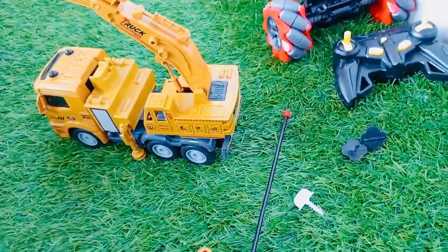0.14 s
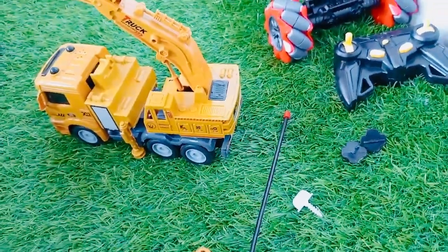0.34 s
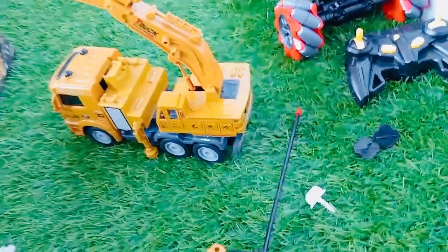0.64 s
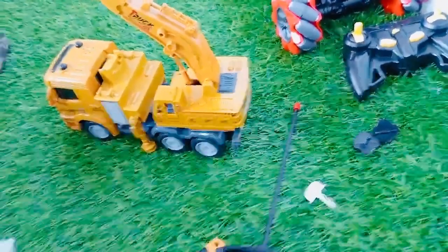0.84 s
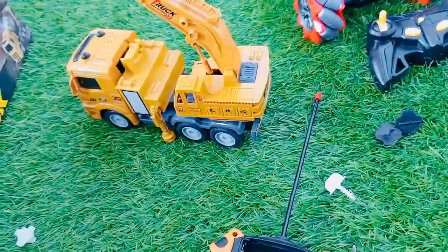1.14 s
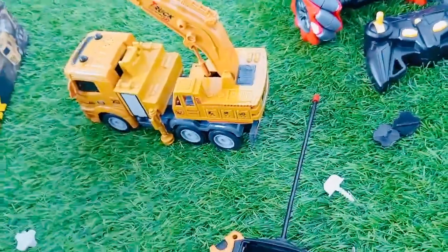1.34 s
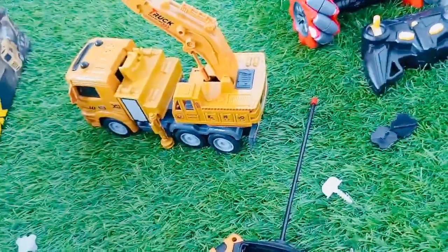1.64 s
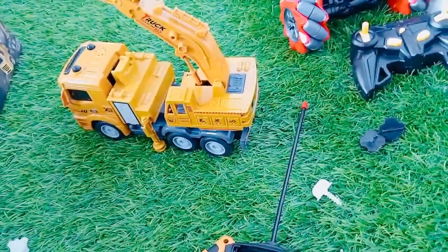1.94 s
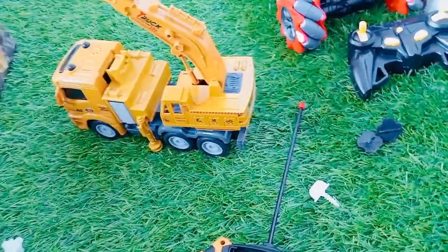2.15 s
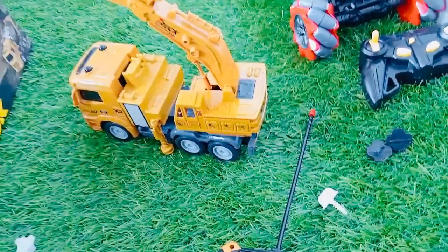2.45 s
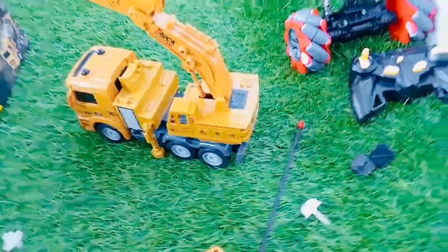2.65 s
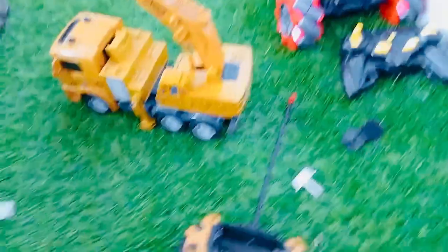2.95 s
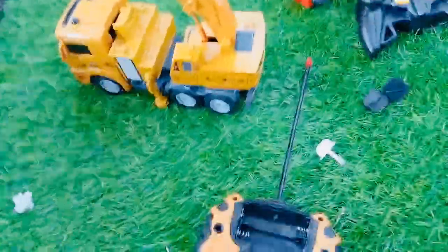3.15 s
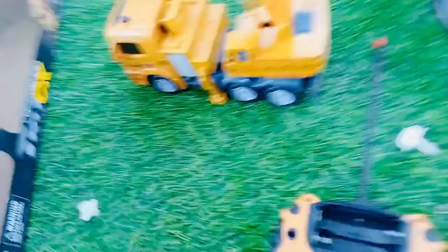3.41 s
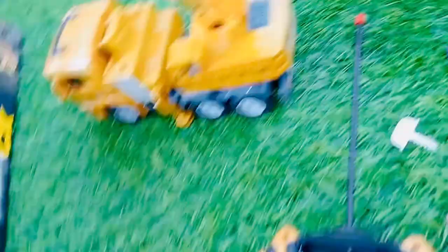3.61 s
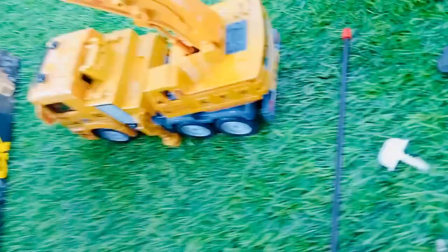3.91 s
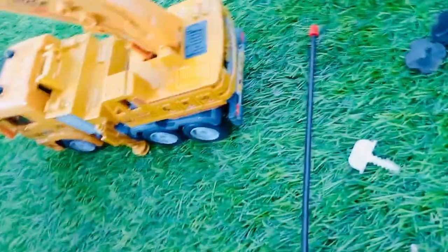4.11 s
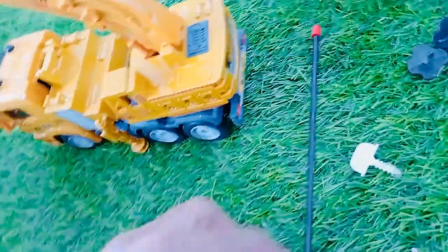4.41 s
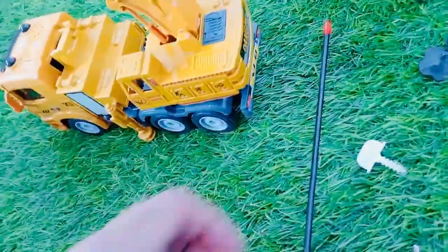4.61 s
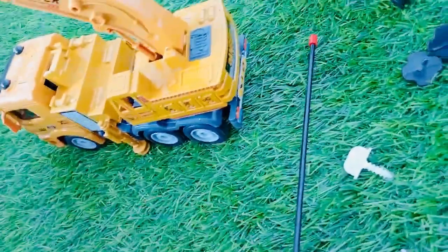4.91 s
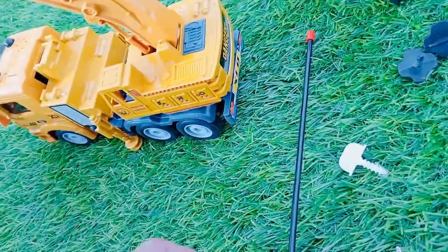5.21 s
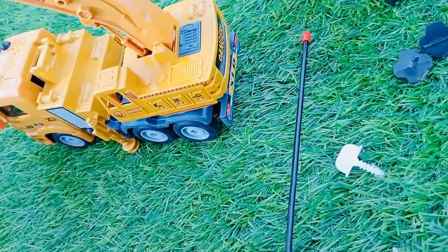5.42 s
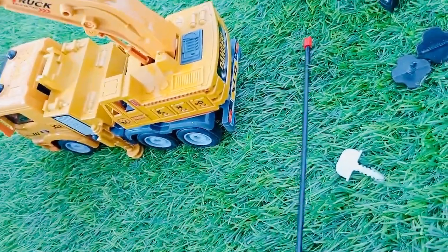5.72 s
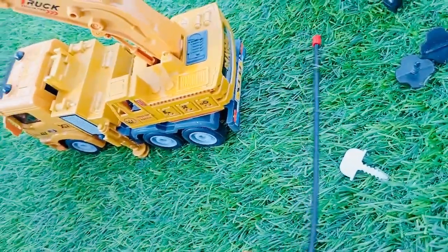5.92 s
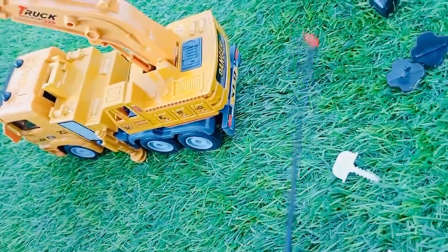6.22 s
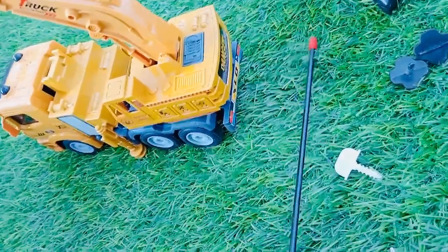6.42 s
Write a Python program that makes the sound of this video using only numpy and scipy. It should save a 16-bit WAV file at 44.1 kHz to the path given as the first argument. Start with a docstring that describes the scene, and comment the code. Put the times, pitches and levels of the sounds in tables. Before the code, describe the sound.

Fingers busily work a small hollow plastic case, clicking and crackling, then easing into rubs and a few sharp knocks above soft rumble and hiss.

```python
"""Clicks, rattles and fine crinkle of a small plastic remote control handled and opened close by;
later a few single knocks and a faint thin whine, over a low hum, rumble and hiss.
Contacts are gritty noise bursts with spectra of the struck parts; crinkle is chance slips ringing
small modes; rubs are shaped noise, the whine three partials. The shell's modes, echoes and a
diffuse tail follow the clicks, knocks and crinkle."""
import sys
import numpy as np
from scipy import signal
from scipy.fft import rfft, irfft, next_fast_len
from scipy.io import wavfile
from scipy.ndimage import uniform_filter1d

SR = 44100
rng = np.random.default_rng(int(sys.argv[2]) if len(sys.argv) > 2 else 0)


def int16_out(signal):
    """Quantize to a 16-bit WAV file."""
    q = np.round(np.clip(np.atleast_2d(signal).T, -1, 1) * 32767)
    wavfile.write(sys.argv[1], SR, q.astype(np.int16))


N = 289296
TIME = np.arange(N) / SR
CONTACT_SAMPLES = 4096
CONTACT_HZ = np.fft.rfftfreq(CONTACT_SAMPLES, 1 / SR)

# fingers working the plastic: (time [s], relative level [dB])
HANDLING = [(0.0, -31), (0.33, -36), (0.42, -58), (0.72, -59.5), (0.8, -38), (1.1, -30), (1.31, -41),
            (1.51, -55.5), (1.91, -32.5), (2.47, -47.5), (2.54, -32), (2.71, -30), (2.79, -56),
            (2.93, -35.5), (3.3, -52.5), (3.61, -60), (3.81, -47.5), (4.3, -72)]
# small parts of the case that ring along with any click: frequency [Hz]
PARTS_HZ = [431, 597, 1020, 1868, 2295, 2520, 2900, 3245, 3630, 4100]


def from_db(db):
    """Decibels to amplitude gain."""
    return 10 ** (np.asarray(db) / 20)


def rms_one(x):
    """Scale to unit rms."""
    return x / np.sqrt(np.mean(x ** 2) + 1e-20)


def in_time(rows):
    """Interpolate a (time, value) curve at every sample."""
    return np.interp(TIME, *np.transpose(rows))


def at_hz(points, hz):
    """Interpolate a spectrum on a log-frequency axis."""
    f, value = np.transpose(points)
    return np.interp(np.log(np.maximum(hz, 1)), np.log(f), value)


def drift(knots_per_s):
    """Random curve of unit rms, straight between its knots."""
    knots = rng.standard_normal(int(N / SR * knots_per_s) + 2)
    return rms_one(np.interp(TIME * knots_per_s, np.arange(len(knots)), knots))


def coloured(x, spectrum):
    """Shape a sound with a fixed spectrum; unit rms."""
    size = next_fast_len(N)
    gain = from_db(at_hz(spectrum, np.fft.rfftfreq(size, 1 / SR)))
    return rms_one(irfft(rfft(x, size) * gain, size)[:N])


def band(x, low_hz, high_hz, order=2):
    """Causal band-pass."""
    return signal.sosfilt(signal.butter(order, [low_hz, high_hz], "band", fs=SR, output="sos"), x)


def resonance(x, hz, width_hz):
    """One two-pole mode, gain 1 at its top."""
    r = np.exp(-np.pi * width_hz / SR)
    zeros = np.array([1, 0, -1]) * (1 - r * r) / 2
    poles = [1, -2 * r * np.cos(2 * np.pi * hz / SR), r * r]
    return signal.lfilter(zeros, poles, x + 1e-18)


def peak(hz, centre_hz, half_width_hz):
    """The shape of one resonance, 1 at its top."""
    return 1 / (1 + ((hz - centre_hz) / half_width_hz) ** 2)


def causal(gain):
    """Minimum-phase response with these gains: nothing sounds before the blow."""
    cepstrum = irfft(np.log(gain))
    half = cepstrum.shape[-1] // 2
    fold = np.r_[1, np.full(half - 1, 2), 1, np.zeros(half - 1)]
    return np.exp(rfft(cepstrum * fold))


def lifted(colour, hz, body_db, edge_db):
    """A contact's spectrum in dB: a heavier blow lifts the bass, a harder edge the treble."""
    body = at_hz([(974, 1), (2160, 0)], hz)
    edge = at_hz([(5300, 0), (9760, 1)], hz)
    return at_hz(colour, hz) + body_db * body + edge_db * edge


def contacts(times, colours_db, chatter_t60, snap, snap_t60, even_hz=1000, gritty_db=3.5, grit_per_s=1500):
    """Each contact is a hard snap and brief chatter of two edges, rung through the struck part."""
    size = CONTACT_SAMPLES
    t = np.arange(size) / SR
    force = from_db(-60 * t / chatter_t60) + snap * from_db(-60 * t / snap_t60)
    noise, grit = rng.standard_normal((len(times), 2, size)).transpose(1, 0, 2)
    held_grit = grit[:, (t * grit_per_s).astype(int) % size]
    chatter = rfft(noise * force * from_db(gritty_db * held_grit))
    # the chatter sets only the fine grain; the broad colour belongs to the part
    broad = np.sqrt(uniform_filter1d(np.abs(chatter) ** 2, max(int(even_hz * size / SR), 1)))
    scale = SR * np.sqrt(.005 / 2)  # refers spectra to rms over 5 ms
    out = np.zeros(N + size)
    for s, colour_db, grain, smooth in zip(times, colours_db, chatter, broad):
        start = max(int(s * SR), 0)
        out[start:start + size] += scale * irfft(grain * causal(from_db(colour_db) / smooth))
    return out[:N]


def background(wander_rad=0.61, flutter_db=1.7, flutter_per_s=16, hiss_db=-56.5):
    """Quickly and slightly fluctuating low noise, steady soft hiss, and hum lines of wavering phase."""
    # hum lines: (frequency [Hz], level [dB rms])
    hum_lines = [(86, -56), (203, -58), (301, -66)]
    # room rumble: (time [s], level [dB])
    rumble_level = [(0.0, -45.5), (2.2, -47.5), (3.8, -43), (6.56, -45)]
    # rumble spectrum: (frequency [Hz], relative density [dB per Hz])
    rumble_colour = [(25, -28), (45, -15.5), (62, -3.5), (88, -1), (125, -4), (150, 1), (210, 2),
                     (255, -10.5), (330, -15), (450, -24), (800, -34.5), (2000, -64.5)]
    # hiss spectrum: (frequency [Hz], relative density [dB per Hz])
    hiss_colour = [(100, -5), (400, 0.5), (1300, -1), (3500, -7.5), (6000, -19.5), (9000, -36.5),
                   (16000, -50)]
    hum = 0
    for hz, db in hum_lines:
        phase = 2 * np.pi * hz * TIME + wander_rad * drift(8)
        hum = hum + from_db(db) * np.sqrt(2) * np.sin(phase)
    level = from_db(in_time(rumble_level) + flutter_db * drift(flutter_per_s))
    rumble = level * coloured(rng.standard_normal(N), rumble_colour)
    hiss = from_db(hiss_db) * coloured(rng.standard_normal(N), hiss_colour)
    return hum + rumble + hiss


def room_tail(first_s=0.0089, build_s=0.00073, size=22000):
    """A diffuse tail of noise bands, each with its own decay time."""
    # room decay: (frequency [Hz], t60 [s])
    decay_t60 = [(300, 0.54), (800, 0.42), (2100, 0.25), (5500, 0.26), (14000, 0.099)]
    # tail colour: (frequency [Hz], level [dB])
    tail_colour = [(200, -3.5), (600, -6), (1300, -6), (2900, -2.5), (6000, -12.5), (14000, -5)]
    t = np.arange(size) / SR
    build = np.clip((t - first_s) / build_s, 0, 1)
    edges_hz = np.geomspace(150, 17000, 11)
    tail = 0
    for low, high in zip(edges_hz, edges_hz[1:]):
        hz = np.sqrt(low * high)
        decay = from_db(-60 * t / at_hz(decay_t60, hz)) * build
        gain = np.sqrt(2 * (high - low) / SR / size) * from_db(at_hz(tail_colour, hz))
        tail = tail + gain * rms_one(band(rng.standard_normal(size), low, high) * decay)
    return tail


def room(x, wall_hz=8000, move_s=.12, count=5):
    """Dulled echoes off nearby surfaces, and a tail whose fine pattern changes as the hands move."""
    # nearby surfaces: (delay [s], level [dB])
    echoes = [(0.0128, -10.5), (.0145, -13), (.0185, -31.5), (0.0263, -14.5), (0.0333, -21), (0.044, -19),
              (0.07, -24.5)]
    dull = signal.lfilter(*signal.butter(1, wall_hz, fs=SR), x)
    out = sum(from_db(db) * np.pad(dull, (int(delay * SR), 0))[:N] for delay, db in echoes)
    for place in range(count):  # crossfade in turn between tails
        share = np.clip(1 - np.abs((TIME / move_s - place) % count - 1), 0, 1)
        out = out + signal.oaconvolve(x * np.sin(np.pi / 2 * share), room_tail())[:N]
    return out


def whine(base_hz=432.5, waver=0.002):
    """Three high partials of one slightly unsteady tone."""
    # thin whine: (time [s], level [dB])
    whine_level = [(5.28, -80), (5.35, -69), (5.5, -65), (5.555, -52), (5.59, -53.5), (5.617, -65),
                   (5.645, -51), (5.69, -66), (5.76, -81)]
    # partials: (multiple of base_hz, relative level [dB])
    partials = [(7, -4.5), (8, 2.5), (9, -9)]
    phase = 2 * np.pi * np.cumsum(base_hz * (1 + waver * drift(32))) / SR
    tone = sum(from_db(db + 2 * drift(35)) * np.sin(round(k) * phase) for k, db in partials)
    sounding = (TIME > whine_level[0][0]) * (TIME < whine_level[-1][0])
    return rms_one(tone) * from_db(in_time(whine_level)) * sounding


def rubs(rub_hz=(950, 1550), rustle_hz=(3800, 6000), uneven_db=3.5, level_db=-7.5):
    """Skin drags unevenly over the case: a dull rub with a light rustle above it."""
    # strokes: (centre time [s], half-length [s], relative rub level [dB], relative rustle level [dB])
    strokes = [(0.415, 0.045, -45, -50), (3.417, 0.26, -51.5, -81), (3.657, 0.062, -41.5, -62),
               (3.74, 0.12, -62, -70), (4.939, .05, -51.5, -66), (5.02, 0.08, -49, -58.5),
               (5.709, 0.076, -53.5, -76.5), (6.222, 0.1, -53.5, -56.5), (6.305, 0.084, -47, -55),
               (6.52, 0.25, -53, -78)]
    rub = rms_one(band(rng.standard_normal(N), *rub_hz))
    rustle = rms_one(band(rng.standard_normal(N), *rustle_hz))
    out = 0
    for s, half_length_s, rub_db, rustle_db in strokes:
        stroke = np.cos(np.pi / 2 * np.clip((TIME - s) / half_length_s, -1, 1)) ** 2
        out = out + stroke * (from_db(rub_db) * rub + from_db(rustle_db) * rustle)
    return out * from_db(uneven_db * drift(70) + level_db)


def low_bodies():
    """Low, hollow body of some clicks, around 300 to 600 Hz."""
    # low bodies: (time [s], relative level [dB])
    bodies = [(0.794, -35.5), (1.531, -38.5), (1.879, -33), (1.908, -36), (2.002, -39), (2.072, -31.5),
              (2.15, -40), (2.854, -28), (2.894, -29), (2.928, -26), (3.04, -39), (3.146, -40),
              (3.254, -41), (3.628, -42)]
    # their spectrum: (frequency [Hz], density [dB per Hz])
    body_colour = [(100, -52), (300, -33.5), (420, -25.5), (520, -32.5), (600, -28), (900, -42.5),
                   (3000, -70), (16000, -94.5)]
    colours = [db + at_hz(body_colour, CONTACT_HZ) for s, db in bodies]
    times = [row[0] for row in bodies]
    return contacts(times, colours, chatter_t60=0.027, snap=0.9, snap_t60=0.006, gritty_db=2.0)


def flicks():
    """A springy catch flicks free, ringing briefly around one high pitch."""
    # releases: (time [s], relative level [dB], ring [Hz])
    releases = [(0.302, -18.5, 4340), (5.906, -18.5, 5300), (6.478, -48.5, 8400)]
    # flick spectrum: (multiple of its ring, density [dB per Hz])
    flick_colour = [(.05, -74), (.42, -56), (.54, -42.5), (.64, -51), (.86, -41), (1, -30), (1.22, -43),
                    (1.5, -55.5), (2.8, -63)]
    colours = []
    for s, db, hz in releases:
        colours.append(db + at_hz([(k * hz, level) for k, level in flick_colour], CONTACT_HZ))
    times = [row[0] for row in releases]
    return contacts(times, colours, chatter_t60=0.024, snap=0.9, snap_t60=0.006, gritty_db=3.0)


def crinkle(per_s=550, spread_db=5.0, clump_db=0.5, slip_t60=0.017, ring_db=11.5, ring_width_hz=260,
            level_db=-3.5, count=20):
    """Clumped gritty slips of plastic on plastic; each rings one small part of the case."""
    # crinkle spectrum: (frequency [Hz], relative density [dB per Hz])
    crinkle_colour = [(150, -51), (250, -22.5), (436, -5.5), (802, -6), (890, 5), (1380, -4.5), (2130, -2),
                      (3980, -0.5), (7310, -8), (12100, -24), (13900, -17), (16000, -34)]
    sizes = from_db(spread_db * np.minimum(rng.exponential(1, N), 3.5))
    slips = sizes * (rng.random(N) < per_s / SR) * from_db(clump_db * drift(90))
    fade = from_db(-60 / (slip_t60 * SR)) ** 2  # power decay per sample
    power = signal.lfilter([1 - fade], [1, -fade], slips ** 2 + 1e-18)
    grit = np.sqrt(power) * rng.standard_normal(N)
    part = rng.integers(0, count, N)
    pitches_hz = np.linspace(900, 7500, count)
    rings = sum(resonance(slips * (part == k), hz, ring_width_hz) for k, hz in enumerate(pitches_hz))
    hands_on = np.clip((HANDLING[-1][0] - TIME) * 10, 0, 1)
    level = from_db(in_time(HANDLING) + level_db) * hands_on
    return coloured(grit + from_db(ring_db) * rings, crinkle_colour) * level


def soften(x, soft_hz=6000, full_db=-40, soft_range_db=16):
    """A light touch makes a duller crinkle: the treble fades as the fingers ease off."""
    dull = signal.sosfilt(signal.butter(2, soft_hz, fs=SR, output="sos"), x)
    firm = np.clip(1.5 + (in_time(HANDLING) - full_db) / soft_range_db, 0, 1)
    return firm * x + np.sqrt(1 - firm ** 2) * dull


def shell(x):
    """The hollow case colours a sound with its own resonances."""
    # shell modes: (frequency [Hz], width [Hz], lift [dB])
    shell_modes = [(686, 63, 2.5), (1020, 180, 0.5), (1340, 410, -2), (1490, 150, 1), (1870, 180, 3),
                   (2370, 82, -0.5), (2946, 39, 0.5), (4150, 470, -1), (5660, 200, 0)]
    return x + sum((from_db(lift_db) - 1) * resonance(x, hz, width) for hz, width, lift_db in shell_modes)


def knocks(ring_share=1, low_db=7.5, low_half_width_hz=190):
    """Each dull knock rings the whole case, with a lower ring that depends on where it lands."""
    # knocks: (time [s], relative level [dB], hollow body lift [dB], hard edge lift [dB],
    #          relative case ring [dB], low ring [Hz])
    blows = [(4.444, -52, 11, 2, 2, 1295), (4.502, -41, 9, -15, 20, 1210), (4.562, -25, 3.5, -7, 6.5, 1256),
             (4.577, -22.5, 0, -7, 10, 1636), (4.581, -27.5, -1.5, 4, 15, 1020),
             (5.172, -41.5, 0, 1, -1, 1800), (5.195, -36.5, 3, -5, 9, 860), (5.769, -28, 4, -1.5, 13, 1520),
             (6.012, -13.5, -3, -0.5, 10.5, 1350)]
    # knock spectrum: (frequency [Hz], density [dB per Hz])
    knock_colour = [(100, -62), (400, -48), (974, -36.5), (1450, -36), (1880, -43), (2300, -38),
                    (4533, -39), (9544, -64), (11000, -60), (16000, -74.5)]
    # modes of the whole case: (frequency [Hz], half-width [Hz], share of its ring)
    case_modes = [(2280, 130, 0.29), (2916, 184, 1.31), (3360, 63, 0.27), (4400, 120, 0.11),
                  (5240, 190, .3), (6180, 310, 0.65)]
    case = sum(share * peak(CONTACT_HZ, hz, width) for hz, width, share in case_modes)
    colours = []
    for s, db, body_db, edge_db, case_db, hz in blows:
        ring = case_db * case + low_db * peak(CONTACT_HZ, hz, low_half_width_hz)
        colours.append(lifted(knock_colour, CONTACT_HZ, body_db, edge_db) + db + ring_share * ring)
    times = [row[0] for row in blows]
    return contacts(times, colours, chatter_t60=0.025, snap=0.99, snap_t60=0.013, gritty_db=1.2)


def light_ticks(level_db=-4.0, spread_db=7.0, body_db=-6.0, edge_db=-8.5, count=40):
    """Rows for clicks(): loose parts tick at random times, as strongly as the fingers press."""
    when, strength, part = rng.random((count, 3)).T
    times = when * HANDLING[-1][0]
    levels = np.interp(times, *np.transpose(HANDLING)) + level_db + spread_db * (2 * strength - 1)
    rings_hz = [PARTS_HZ[int(k)] for k in part * len(PARTS_HZ)]
    return [(s, db, body_db, edge_db, hz) for s, db, hz in zip(times, levels, rings_hz)]


def clicks(rows, ring_share=1, main_db=10.0, ring_half_width_hz=170, shoulder_db=3.5, shoulder_width=.25,
           parts_db=3.0, parts_width=0.024, level_db=-1.0):
    """Each click rings the struck part on a broad shoulder, and other parts by chance amounts."""
    # click spectrum: (frequency [Hz], density [dB per Hz])
    click_colour = [(100, -68.5), (400, -45), (700, -38), (974, -32), (1400, -38), (2176, -38),
                    (4533, -36.5), (9544, -42), (11500, -49.5), (13500, -49), (16000, -55)]
    part_peaks = [peak(CONTACT_HZ, hz, parts_width * hz) for hz in PARTS_HZ]
    others = rng.exponential(1, (len(rows), len(PARTS_HZ))).clip(0, 2) @ part_peaks
    colours = []
    for (s, db, body_db, edge_db, hz), along in zip(rows, others):
        strike = lifted(click_colour, CONTACT_HZ, body_db, edge_db) + db + level_db
        shoulder = shoulder_db * peak(CONTACT_HZ, hz, shoulder_width * hz)
        ring = np.maximum(main_db * peak(CONTACT_HZ, hz, ring_half_width_hz), parts_db * along)
        colours.append(strike + shoulder + ring_share * ring)
    return contacts([row[0] for row in rows], colours, chatter_t60=0.025, snap=0.93, snap_t60=0.0063)


def scene(click_ring=0.55, knock_ring=0.69, click_room_db=1.5, knock_room_db=1.5):
    """The remote, its room, and the background."""
    # case clicks under the fingers: (time [s], relative level [dB], hollow body lift [dB],
    #                                 hard edge lift [dB], ring of the struck part [Hz])
    finger_clicks = [(0.017, -27, -29, -31, 2610), (0.065, -17.5, -1, -10, 6800),
                     (0.082, -31, -18, 5, 4600), (0.093, -23, -14, -11.5, 2600), (0.102, -23, -6, -4, 2460),
                     (0.14, -19, -9, -7.5, 6270), (0.207, -30.5, 2, -5, 1870), (0.2446, -18, -6, -10, 2536),
                     (0.251, -18, -7, -7, 2210), (0.279, -29, -2, -19, 2530), (0.288, -27, -2, 5.5, 3440),
                     (0.376, -40.5, -16, 7.5, 4620), (0.769, -34, 3.5, -1.5, 1870),
                     (0.786, -32, 1, -6, 4070), (0.791, -17, -8, -22, 1775), (0.794, -18, -16, -6.5, 1860),
                     (0.831, -25.5, -13, 3, 1790), (0.863, -31, -20, -1, 4900), (0.915, -24, -2, -8, 970),
                     (0.951, -44, -2, -12, 1790), (0.977, -25, -23, -8.5, 1846),
                     (1.02, -22.5, -9, -5, 2520), (1.026, -25, 1, -6, 2580), (1.037, -22, -3.5, -1.5, 2270),
                     (1.053, -23.5, -16, 0, 4860), (1.064, -30.5, -1, 10, 3660),
                     (1.09, -22.5, -19, -18, 2470), (1.102, -30, -18, -5, 4400),
                     (1.112, -22.5, -4, -6, 4800), (1.116, -15, -4.5, -5.5, 4040),
                     (1.143, -25.5, -13, 0, 4270), (1.159, -26.5, -2, -2, 4200),
                     (1.185, -27.5, -11, -16, 4860), (1.2, -26, 0, -13, 3700),
                     (1.226, -29.5, -3, -27, 2590), (1.303, -34.5, 6, -6, 3270),
                     (1.322, -32.5, -1, -4.5, 3490), (1.384, -25, -3.5, -7.5, 910),
                     (1.423, -34, 4, -12, 3980), (1.43, -28, -5, -4, 3950), (1.453, -32.5, 4, -8, 2560),
                     (1.531, -24, 0, -20.5, 2530), (1.625, -39, -16, -23, 3270),
                     (1.684, -29, -2.5, -22, 2470), (1.701, -35.5, 1, -30, 2280),
                     (1.735, -35, -2, -10, 4470), (1.76, -27, -6, -8, 2540), (1.799, -27.5, -17, -1, 2600),
                     (1.811, -27.5, -14, -4, 3960), (1.816, -28, -12, -12, 2500),
                     (1.879, -23, -10, -6, 1970), (1.904, -38.5, 6, -24, 990), (1.909, -22, -8, -4.5, 3700),
                     (2.002, -25.5, 1, -10, 2930), (2.007, -19, -7.5, -7, 2870),
                     (2.016, -19.5, -6.5, -5.5, 2950), (2.072, -29.5, 2, -6.5, 3950),
                     (2.122, -43, -13.5, -5, 4220), (2.15, -37, 2.5, -2.5, 3870), (2.179, -43, 6, 0, 2070),
                     (2.225, -44, -12, 4, 6250), (2.259, -32, -15, -2.5, 7100),
                     (2.341, -38.5, -11.5, -1.5, 4200), (2.389, -38, -14.5, 3.5, 4600),
                     (2.406, -35, -4, -4, 4170), (2.5027, -17.5, -15.5, -3.5, 6410),
                     (2.518, -30.5, -1, -10, 3300), (2.531, -19.5, -6.5, -11.5, 4380),
                     (2.534, -21, -3, -5.5, 4430), (2.615, -29, -2, -6, 3700),
                     (2.623, -20.5, -8, -6.5, 3780), (2.65, -20, -7, -8, 4350),
                     (2.667, -34.5, 14.5, -22, 3780), (2.701, -26, -11, -37, 3800),
                     (2.731, -24.5, 1, -6, 3990), (2.745, -30.5, 1, -17, 2470), (2.8, -16, -8, -7.5, 2230),
                     (2.837, -39.5, 7, 5, 2030), (2.854, -16, -3, -8, 3540), (2.868, -21.5, -11, -8, 3840),
                     (2.894, -23.5, -2.5, -5, 4430), (2.909, -24, -3, -16, 3940), (2.916, -20, 0, -3, 4200),
                     (2.921, -25.5, -0.5, 2, 4060), (2.929, -23, -5, -13, 2760),
                     (2.942, -24.5, -18, -4, 3750), (2.947, -27, 5.5, 4, 3770), (2.957, -29, -1, 0, 2900),
                     (2.987, -20.5, -2.5, -3, 2660), (3.04, -36, 2, -5, 3250), (3.087, -41, -2, -24, 2650),
                     (3.103, -21, -9, -12, 3980), (3.147, -38, 6.5, 7, 4180), (3.253, -42, 2.5, 1.5, 4170),
                     (3.35, -38, -18, -10, 4150), (3.628, -34, 2.5, -14, 3970),
                     (3.654, -33.5, -6.5, -7, 4080), (3.793, -38.5, -8, -10, 2380),
                     (3.807, -39, -10, -14, 2310), (3.836, -42, -16, -7, 2320), (3.955, -44, -20, -7, 3870),
                     (4.055, -45, -18, -2.5, 4120), (4.086, -47, -18, -8, 4400),
                     (4.193, -29.5, -21, -17, 4580), (5.958, -37, -5.5, -6, 1242),
                     (6.508, -45, -23, -18, 4160)]
    # the room answers more as the remote is turned away: (time [s], room send [dB])
    wetness = [(0, -5.5), (1.5, -1.5), (2.8, -3.5), (3.2, -4.5), (4.2, -0.5), (6.5, 1.5)]
    small = soften(crinkle()) + flicks() + low_bodies()
    rows = finger_clicks + light_ticks()
    direct = shell(clicks(rows) + knocks() + small)
    # the walls receive the case from all sides, which evens out its resonances
    room_clicks = from_db(click_room_db) * clicks(rows, click_ring)
    room_knocks = from_db(knock_room_db) * knocks(knock_ring)
    scattered = shell(room_clicks + room_knocks + small)
    reflected = room(scattered * from_db(in_time(wetness)))
    return (direct + reflected + rubs() + whine() + background())[None]


def record(dry, cutoff_hz=15850):
    """Clip the highest peaks and cut the top of the treble."""
    low_pass = signal.ellip(10, .1, 80, cutoff_hz, fs=SR, output="sos")
    return signal.sosfilt(low_pass, np.clip(dry, -.88, .88))


dry = scene()
out = record(dry)
int16_out(out)
```